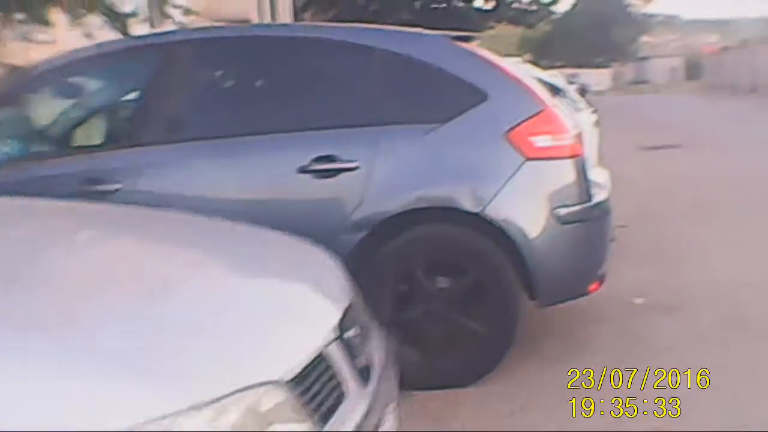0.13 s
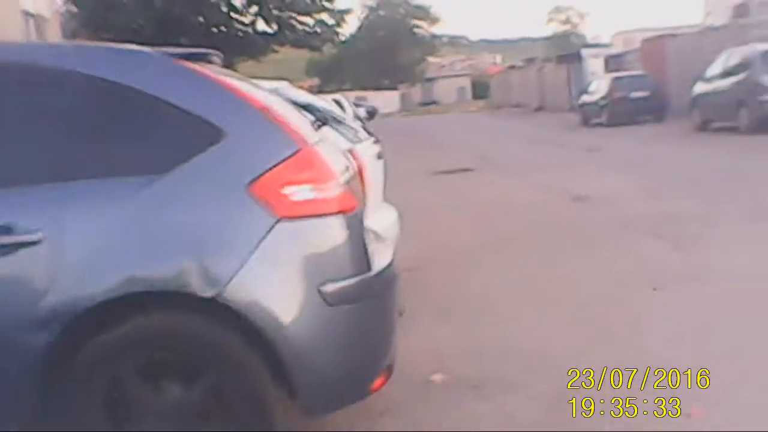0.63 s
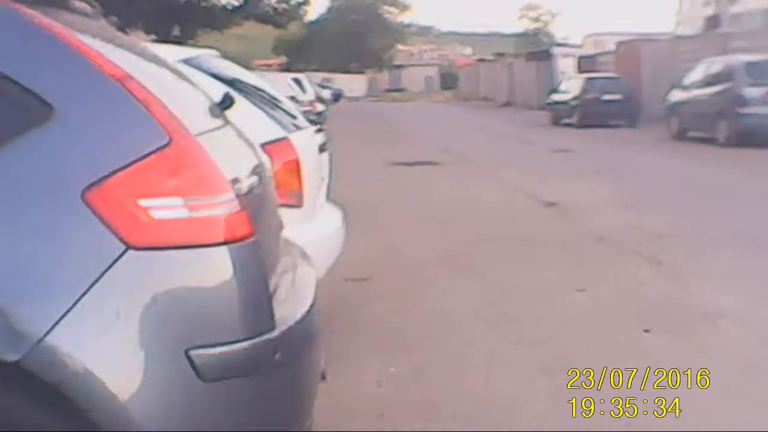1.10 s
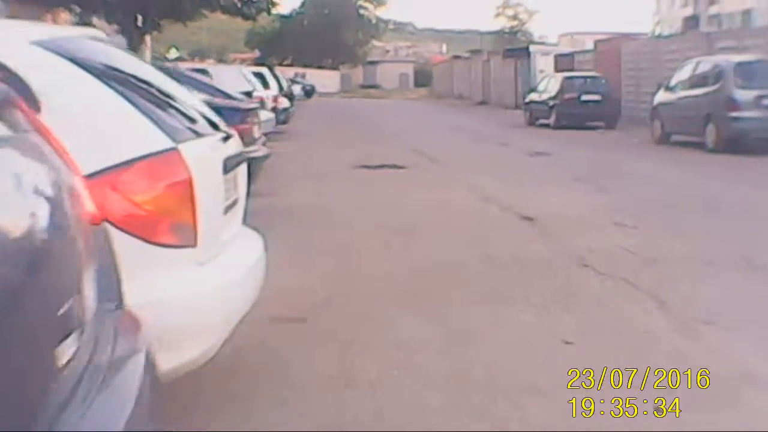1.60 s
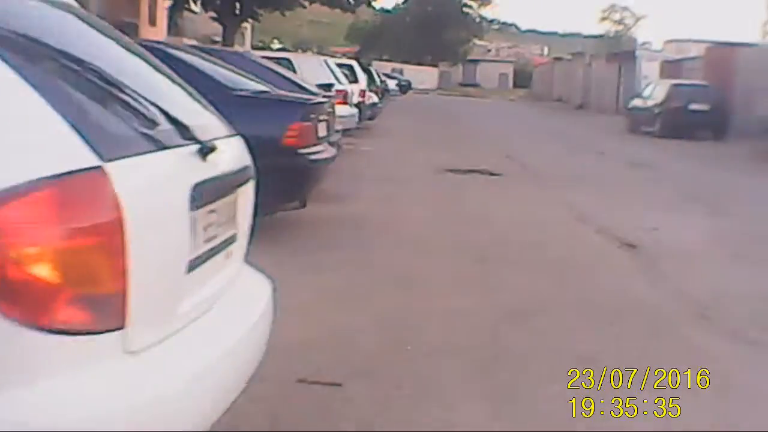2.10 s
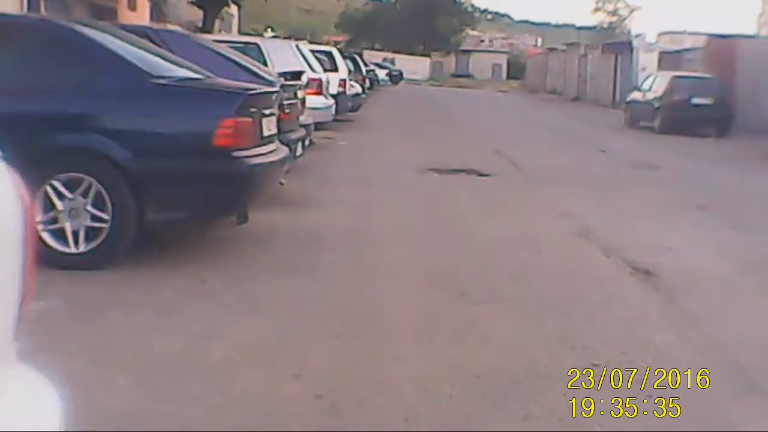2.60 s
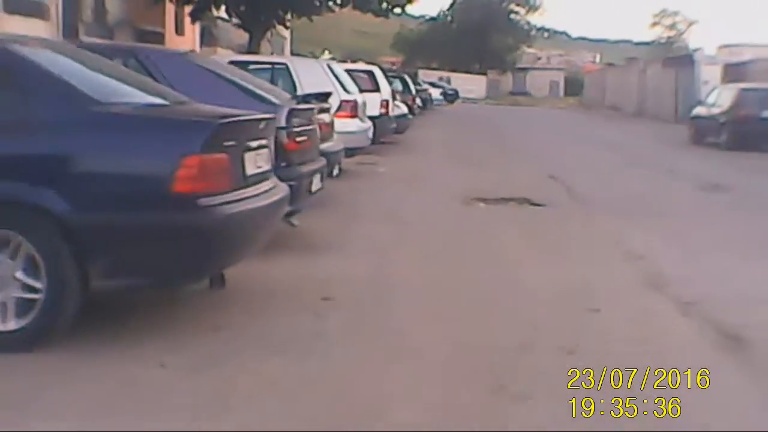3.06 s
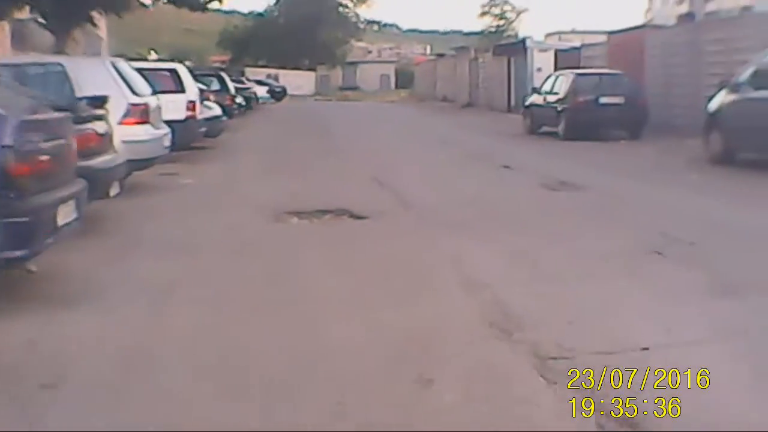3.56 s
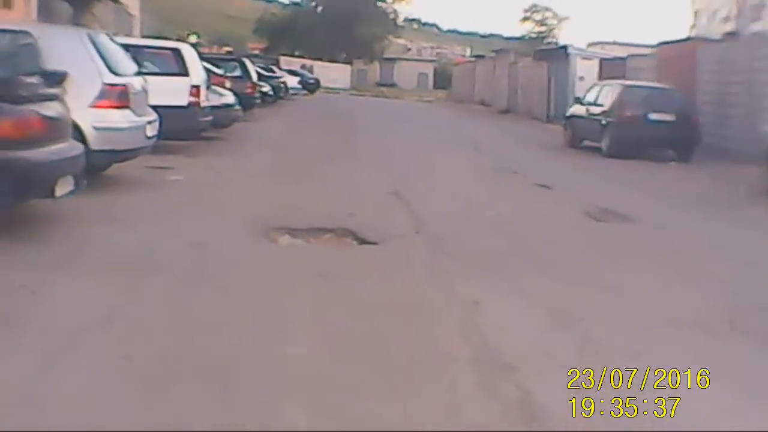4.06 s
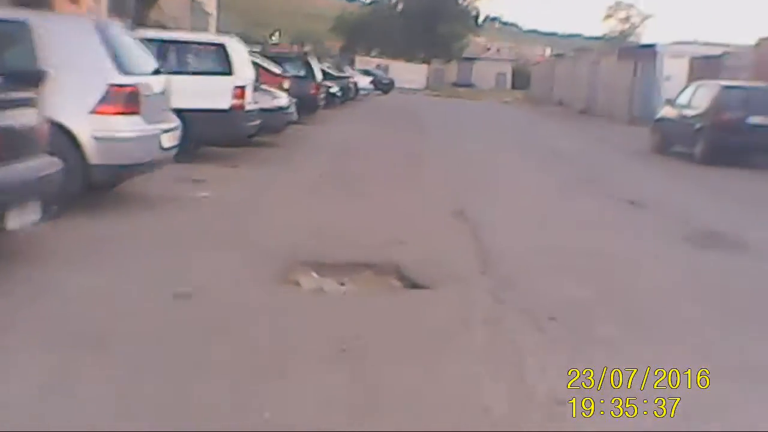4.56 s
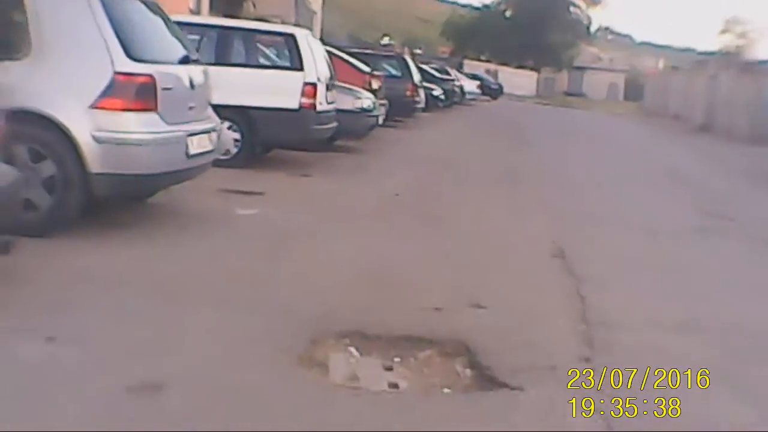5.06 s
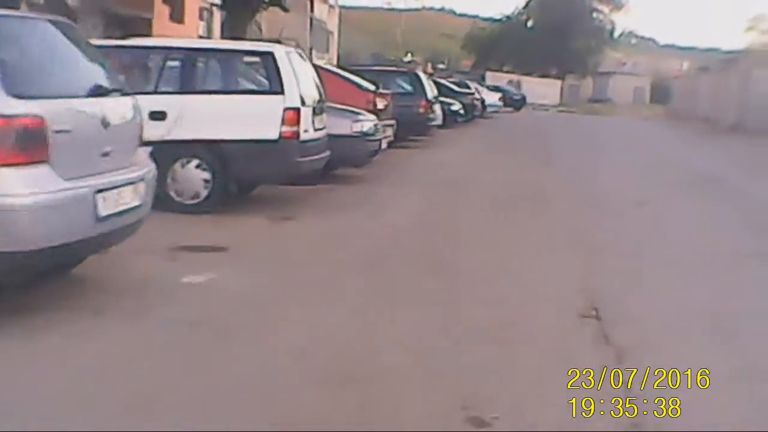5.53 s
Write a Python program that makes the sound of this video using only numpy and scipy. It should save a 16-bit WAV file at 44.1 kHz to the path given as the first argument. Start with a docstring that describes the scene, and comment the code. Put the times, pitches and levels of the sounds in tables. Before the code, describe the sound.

Bicycle tyres roll over rough asphalt with a low rumble and gritty hiss, loose ticks and sparrow chirps, then loud sharp knocks after four seconds.

```python
"""A rough asphalt road, heard by a small camera clamped to a bicycle. Shaped noise makes the hum and rumble of
the frame and the hiss of the tyres. Short fading tones make the ticks, knocks and rattles of the loose housing
and the thuds of the frame. Sparrows are husky gliding whistles. The camera samples slowly and holds each
sample, which mirrors the sound into the treble."""
import sys
import numpy as np
from scipy import signal
from scipy.io import wavfile
from scipy.ndimage import uniform_filter1d

SR = 44100
rng = np.random.default_rng(int(sys.argv[2]) if len(sys.argv) > 2 else 0)


def volts_from_db(level):
    """Convert decibel levels to linear amplitude ratios."""
    exponent = np.asarray(level, float) / 20
    return 10 ** exponent


def unload_wav(signal):
    """Save mono or channel-first audio to the path in sys.argv[1] as 16-bit WAV at rate SR, clipped to [-1, 1]."""
    wavfile.write(
        sys.argv[1],
        SR,
        np.round(np.clip(np.atleast_2d(signal).T, -1, 1) * 32767).astype(np.int16),
    )


N = 249729  # length in samples


def evened(x):
    """Scales a sound to rms 1."""
    return x / np.sqrt(np.mean(x ** 2) + 1e-20)


def add(mix, start_s, sound):
    """Mixes a sound in at start_s seconds."""
    part = mix[max(round(start_s * SR), 0):][:len(sound)]
    part += sound[:len(part)]


def read(points, hz):
    """Reads a spectrum table at the frequencies hz, along a logarithmic scale."""
    f, value = np.transpose(points)
    return np.interp(np.log(hz + 1), np.log(f + 1), value)


def noise(points, size, patchy_db, flicker_db):
    """Coloured noise of rms 1 with drifting patches and a flicker shared by all frequencies."""
    frames, hz = 4 * N // size + 5, np.fft.rfftfreq(size, 1 / SR)
    real, imaginary, patches = rng.standard_normal((frames, len(hz), 3)).T
    patches = uniform_filter1d(patches, size=5, axis=0)  # across frequency
    patches = evened(uniform_filter1d(patches, size=6, axis=1))  # across time
    flicker = evened(uniform_filter1d(rng.standard_normal(frames), size=3))
    level_db = read(points, hz)[:, None] + patchy_db * patches + flicker_db * flicker
    spectrum = (real + 1j * imaginary) * volts_from_db(level_db)
    return evened(signal.istft(spectrum, nperseg=size, noverlap=3 * size // 4)[1][:N])


def resonate(x, hz, width):
    """A steady resonance applied twice, rms 1."""
    b, a = signal.iirpeak(hz, hz / width, SR)
    return evened(signal.lfilter(b, a, signal.lfilter(b, a, x)))


def steadied(x, share, size):
    """Takes a share of the chance swell out of narrow noise, so that its level curve leads."""
    power = uniform_filter1d(x ** 2, size) + 0.0011
    return evened(x / power ** (share / 2))


def modes(table, contact_ms=0):
    """Fading tones of chance phase that swell within a cycle and hold while the contact lasts; peak about 1."""
    t = np.arange(3000) / SR
    after = np.maximum(t - contact_ms / 1000, 0)
    tones = np.zeros(len(t))
    for (hz, db, t60), (detune, phase) in zip(table, rng.random((len(table), 2))):
        swell = (1 - np.exp(-1.2 * hz * t)) ** 2
        tuned_hz = hz * (1 + 0.083 * (detune - .5))
        # the phase is a random part of a turn, from 0 to 1
        tones += volts_from_db(db - 60 * after / t60) * swell * np.cos(2 * np.pi * (tuned_hz * t + phase))
    return tones / np.sqrt(2 * uniform_filter1d(tones ** 2, size=130).max())


# The asphalt under the wheels: t/s, grit level/dB, unevenness level/dB
ROAD_SURFACE = [(0.0, -55.5, -60), (0.03, -55, -56.5), (0.82, -57, -57.5), (0.85, -54.5, -54.5),
                (1.53, -57, -51.5), (1.62, -53.5, -45.5), (1.75, -56, -52), (2.63, -53, -51),
                (2.76, -55.5, -42), (2.79, -55, -47.5), (2.98, -54, -49), (3.0, -55.5, -44.5),
                (3.1, -53.5, -51), (3.26, -53, -45.5), (3.45, -51.5, -46), (4.63, -50, -49),
                (4.65, -51, -44.5), (5.66, -51.5, -50.5)]


def road(column):
    """One property of the road (1 grit, 2 unevenness) as a gain per sample."""
    rows = np.array(ROAD_SURFACE)
    return volts_from_db(np.interp(np.arange(N) / SR, rows[:, 0], rows[:, column]))


# Dips in the road that set the frame bouncing: t/s, held/s, level/dB
ROAD_DIPS = [(0.14, 0.17, -44), (0.4, .26, -41), (0.9, 0.034, -41.5), (1.08, 0.014, -41.5),
             (1.19, 0.081, -42), (1.35, 0.026, -43), (1.46, 0.007, -40), (1.6, 0.16, -43), (1.94, .01, -47),
             (2.1, .02, -50), (2.27, .02, -46), (2.42, 0.053, -44.5), (2.62, 0.11, -41),
             (2.93, 0.066, -42.5), (3.28, 0.032, -41), (3.47, .38, -46.5), (3.91, .02, -43),
             (4.09, 0.05, -38.5), (4.48, 0.023, -41), (4.61, .02, -55), (4.71, 0.0045, -31),
             (4.839, 0.22, -41.5), (5.18, 0.027, -38), (5.31, 0.063, -40.5), (5.5, 0.04, -40)]
BETWEEN_DIPS_DB, SWELL_DB_PER_S, SETTLE_DB_PER_S = -49, 281, 247


def dips():
    """Gain of the bounce: it swells into each dip, holds and settles."""
    t = np.arange(0, N, 64) / SR
    s, held, db = np.transpose(ROAD_DIPS)[:, :, None]
    early_s, late_s = np.maximum(s - t, 0), np.maximum(t - s - held, 0)
    shape_db = db - SWELL_DB_PER_S * early_s - SETTLE_DB_PER_S * late_s
    return np.interp(np.arange(N) / SR, t, volts_from_db(np.maximum(shape_db.max(0), BETWEEN_DIPS_DB)))


# The frame on its tyres, one resonance: f/Hz, width/Hz
FRAME_BOUNCE = (52.9, 7.6)


def bounce():
    """The frame springs on its tyres: a narrow low hum that grows in the dips."""
    hum = resonate(rng.standard_normal(N), *FRAME_BOUNCE)
    return dips() * steadied(hum, 1.0, size=1700)


# Spectrum of the frame's rumble: f/Hz, relative level/dB
RUMBLE_SPECTRUM = [(60, -40), (80, -11), (110, -9), (170, -15.5), (300, -16), (420, -29), (700, -71)]


def rumble():
    """Uneven road shakes the frame, which answers with broad low noise."""
    sound = noise(RUMBLE_SPECTRUM, size=2048, patchy_db=2.5, flicker_db=1.0)
    return volts_from_db(3.0) * road(column=2) * steadied(sound, 0.13, size=1300)


# Air inside the tyre, one resonance: f/Hz, width/Hz, level/dB over the road's grit
TYRE_CAVITY = (212.8, 37, 0.83)


def cavity():
    """Grit keeps the air inside the tyre humming at its own pitch."""
    hz, width, db = TYRE_CAVITY
    hum = steadied(resonate(rng.standard_normal(N), hz, width), 0.13, size=1300)
    return volts_from_db(db) * road(column=1) * hum


# Spectrum of the slow shaking: f/Hz, relative level/dB
SWAY_SPECTRUM = [(8, 5), (20, 3), (35, 2.5), (70, -1), (100, -34), (200, -93)]


def sway():
    """Slow shaking: very low noise whose level flickers strongly."""
    return volts_from_db(-50) * noise(SWAY_SPECTRUM, size=4096, patchy_db=3.0, flicker_db=7.0)


# Spectrum of the tyre hiss: f/Hz, relative level/dB
HISS_SPECTRUM = [(210, -19), (350, -4), (581, -4), (699, -2.5), (860, -2.5), (1060, -11), (1160, -9.5),
                 (1330, -6.5), (1860, -14), (2340, -17), (3240, -25.5), (3800, -20), (5500, -41),
                 (7150, -66), (12100, -120)]


def hiss():
    """Grit under the tread hisses, following the road."""
    sound = noise(HISS_SPECTRUM, size=512, patchy_db=2.5, flicker_db=0.37)
    return volts_from_db(-0.5) * road(column=1) * sound


# What the housing and clamp ring with, in four groups (hard, dull, woody, bright); the knocks and
# rattles ring it too: f/Hz, relative level/dB, time to fade 60 dB/s
HOUSING_MODES = [
    [(1840, 0.5, 0.017), (2054, 4, 0.014), (2262, 2, 0.016), (2590, 0, 0.0093), (2986, -8.5, 0.026)],
    [(675, 0, .04), (935, -2, .035)],
    [(1221, 4, 0.017), (1326, 3, 0.018), (1553, 4, 0.008)],
    [(3600, 12.5, 0.0093), (3850, 8, 0.016), (4344, 7, 0.014), (4907, 4, 0.0096)],
]
TICKS_PER_S, TICKS_DB = 230, -8.5  # average rate; level over the road's grit


def ticks():
    """Small jolts at chance moments tick one or another part of the housing."""
    strength = volts_from_db(4 * np.minimum(rng.exponential(1, N), 3))  # 0 to 12 dB
    jolts = strength * (rng.random(N) < TICKS_PER_S / SR)
    part = rng.integers(0, len(HOUSING_MODES), N)
    out = np.zeros(N)
    for k, db in enumerate([-3.5, -4.5, -2.5, -7.5]):
        out += volts_from_db(db) * signal.oaconvolve(jolts * (part == k), modes(HOUSING_MODES[k]))[:N]
    return road(column=1) * volts_from_db(TICKS_DB) * evened(out)


# Sparrow calls, before flutter and echoes: t/s, length/s, top f/Hz, rms level/dB
SPARROW_CHIRPS = [(0, 0.087, 4000, -64), (1.243, 0.11, 4590, -67), (1.39, 0.064, 3870, -69.5),
                  (1.483, 0.063, 3910, -67.5), (2.14, 0.084, 4600, -62.5), (2.965, 0.086, 4030, -70),
                  (3.399, 0.048, 4090, -61.5), (3.675, 0.058, 4510, -64.5), (3.742, 0.051, 3890, -72),
                  (4.367, 0.085, 4070, -65), (5.429, 0.071, 4510, -65), (5.479, 0.054, 3850, -61.5)]
ONSET_HZ, REST_HZ, SAG_S = 4130, 3380, 0.0372  # pitch before flutter: start, resting pitch, sag time


def sparrows():
    """Rough little whistles glide to a top pitch, sag huskily, then echo off the walls and cars."""
    out = np.zeros(N)
    for s, length, top_hz, db in SPARROW_CHIRPS:
        t = np.arange(round(length * SR)) / SR
        flutter, husk = (evened(uniform_filter1d(v, size=110)[:len(t)]) for v in rng.standard_normal((2, 6000)))
        end_hz = REST_HZ + (top_hz - REST_HZ) * np.exp(-length / SAG_S)
        hz = np.interp(t / length, [0, .25, 1], [ONSET_HZ, top_hz, end_hz])
        hz = hz * (1 + 0.0486 * flutter * (0.28 + t / length))  # the warble grows
        whistle = np.sin(2 * np.pi * np.cumsum(hz) / SR)
        tone = whistle * (1 + husk) * signal.windows.tukey(len(t), .4)
        add(out, s, volts_from_db(db) * evened(tone))
    t = np.arange(9000) / SR
    # sparse reflections, fading at the rate of 60 dB in 0.32 s
    echoes = rng.standard_normal(len(t)) * (rng.random(len(t)) < .05) * volts_from_db(-60 * t / 0.32)
    return out + volts_from_db(2.5) * signal.oaconvolve(out, echoes / np.linalg.norm(echoes))[:N]


def struck(colour, narrow_db):
    """Gain of each group of modes, falling away from the colour of the blow, to -28.5 dB at the lowest."""
    octaves = np.log2([np.mean(group, axis=0)[0] / 1000 for group in HOUSING_MODES])
    return volts_from_db(np.maximum(-abs(narrow_db) * (octaves - colour) ** 2, -28.5))


# Blows, which favour the modes near their colour: t/s, level/dB before the group gains,
# colour/octaves above 1 kHz, narrowness/dB per octave squared (its sign is ignored)
HOUSING_KNOCKS = [(0.089, -45.5, 1.8, 5), (0.107, -47, 1.2, 6), (0.2652, -46, 1.1, 11),
                  (0.3352, -53, 2.7, -1), (0.4279, -50, -1, 1), (0.5233, -48, .7, 4.5),
                  (0.7591, -42.5, 0.3, 4.5), (0.7687, -48, 2.8, 14), (0.829, -48, 1.15, 11),
                  (0.8809, -45, 1.5, 20), (0.9307, -52, 1.3, 11), (1.0655, -36, -1.6, 2.5),
                  (1.145, -58, 0, 1), (1.2168, -46.5, -0.2, 16.5), (1.264, -45, 1.5, 19),
                  (1.2758, -46.5, -2.7, 0), (1.365, -40.5, .5, 22), (1.4054, -49.5, 1.5, 13),
                  (1.6317, -52.5, 2.5, 0.5), (1.6611, -43, 0, 22), (1.8694, -46.5, 1, 11),
                  (1.889, -47.5, 1, 8), (1.968, -46, 2.7, 2.5), (2.0106, -51.5, 0.2, 2),
                  (2.255, -49, 0.9, 4), (2.308, -41, 1.2, 20), (2.3408, -47.5, 0.2, 5), (2.381, -53, 2, 12),
                  (2.489, -37.5, 1.1, 15), (2.7302, -41.5, 0.8, 7), (2.9195, -47, 0.8, 6),
                  (3.028, -43, .7, 9), (3.268, -49.5, 1.5, 5), (3.3179, -51, 0.2, 1.5),
                  (3.372, -56.5, 4, 6), (3.512, -52, 1, 10), (3.546, -42, 1.6, 11), (3.602, -41, 1.5, 20),
                  (3.62, -39.5, 2, 12), (3.898, -39.5, 1.3, 10), (4.1237, -4, 2.23, 9.5),
                  (4.1267, -15.5, 1.9, 3.5), (4.2435, -27, 1.2, 8), (4.2457, -9.5, 1.56, 6),
                  (4.328, -41, -.5, 14), (4.485, -38, 6, 0.5), (4.4932, -49, 2, 3), (4.5224, -39, 0.14, 14),
                  (4.6019, -44, 0.2, 7), (4.652, -31, -0.1, 16), (4.6915, -34.5, 1, 4),
                  (4.7674, -48, -3, 5), (4.871, -45, 0.3, 14), (4.9766, -29.5, 0.83, 39),
                  (5.0902, -48.5, 1, 5.5), (5.1675, -60, -4, 14), (5.2714, -18.5, 0.89, 17.5),
                  (5.3077, -42, 1.15, 22), (5.6328, -49, 0.9, -2)]
CONTACT_MS = 1.43  # how long a blow presses


def knocks():
    """Each blow rings the four groups of modes according to its colour."""
    out = np.zeros(N)
    for s, db, colour, narrow_db in HOUSING_KNOCKS:
        gains = struck(colour, narrow_db)
        blow = sum(gain * modes(group, CONTACT_MS) for gain, group in zip(gains, HOUSING_MODES))
        add(out, s, volts_from_db(db) * blow)
    return out


# Short chatters of the housing, some of them along with a blow: t/s, length/s,
# rms level/dB before the group gains, colour/octaves above 1 kHz
HOUSING_RATTLES = [(0.765, 0.041, -54.5, -0.25), (1.067, 0.0081, -42.5, -0.96), (2.728, 0.012, -50.5, 0.22),
                   (2.968, 0.1, -59.5, 0.9), (3.552, 0.045, -59.5, 0.92), (4.131, 0.013, -43, -0.46),
                   (4.247, 0.031, -37.5, 1.75), (4.492, 0.029, -52, 0.65), (4.649, 0.031, -40.5, 0.51),
                   (4.686, 0.021, -35.5, -0.19), (4.711, 0.025, -46, 0.56), (4.731, 0.066, -59.5, 2.4),
                   (4.766, 0.05, -52, 0.27), (4.98, 0.0088, -53.5, 2.3), (5.086, 0.018, -49, 0.13),
                   (5.274, 0.023, -48.5, 0.04)]


def rattles():
    """Quick uneven taps that die away ring the housing's modes."""
    out, draws = np.zeros(N), rng.standard_normal((len(HOUSING_RATTLES), 2, 5000))
    for (s, length, db, colour), (force, chance) in zip(HOUSING_RATTLES, draws):
        progress = np.arange(min(round(length * SR), 5000)) / SR / length
        uneven = force * (0.56 + (chance > 2.2) * 1.85)  # a few taps are much harder
        taps = uneven[:len(progress)] * volts_from_db(-9 * progress)
        for gain, group in zip(struck(colour, narrow_db=4), HOUSING_MODES):
            ringing = signal.oaconvolve(taps, modes(group))[:len(progress) + 400]
            add(out, s, gain * volts_from_db(db) * evened(ringing))
    return out


# A wheel drops on an edge: t/s, peak level/dB
WHEEL_DROPS = [(0.769, -40), (1.067, -34.5), (1.288, -35), (1.641, -46), (2.74, -57), (3.38, -44),
               (3.729, -33), (3.91, -49), (4.497, -31), (4.656, -19.5), (4.756, -33), (5.191, -37),
               (5.3, -35)]
# What each drop sounds in the frame: f/Hz, relative level/dB, time to fade 60 dB/s
THUD_MODES = [(216.5, -7.5, 0.069), (291, -4, 0.028)]


def thuds():
    """A wheel drops on an edge and thumps the frame, which rings with low fading tones."""
    out = np.zeros(N)
    for s, db in WHEEL_DROPS:
        add(out, s, volts_from_db(db) * modes(THUD_MODES))
    return out


def scene():
    """Everything reaches one microphone."""
    frame = bounce() + rumble() + cavity() + sway()
    tyres = hiss() + ticks()
    return (frame + tyres + sparrows() + knocks() + rattles() + thuds())[None]


def top_cut(x):
    """Nothing passes above the cut-off."""
    return signal.sosfilt(signal.butter(12, 16740, fs=SR, output="sos"), x)


def record(dry):
    """Slow sampling with an offset, each sample held twice, smooth upsampling, then overload at full scale."""
    slow = signal.resample_poly(dry, 1, 4, axis=1, window=("kaiser", 5)) + .0085  # a quarter of SR
    self_noise = volts_from_db(-69) * rng.standard_normal(slow.shape)  # the recorder's own even hiss
    held = np.repeat(slow + self_noise, 2, axis=1)  # holding makes the mirror image
    held = signal.lfilter([.9, .1], [1], held)  # the top of the mirror image is slightly dulled
    smooth = signal.firwin(255, .497, window=("kaiser", 10))
    full = signal.resample_poly(held, 2, 1, axis=1, window=smooth)
    mix = np.clip(full[:, :N], -1, 1)
    return top_cut(mix)


dry = scene()
out = record(dry)
unload_wav(out)
```